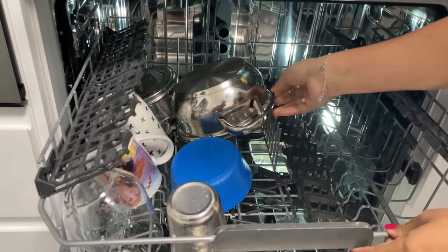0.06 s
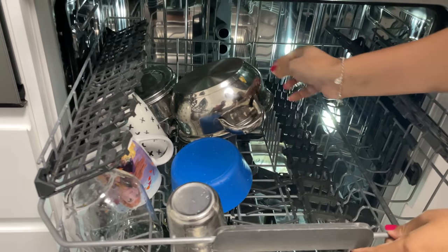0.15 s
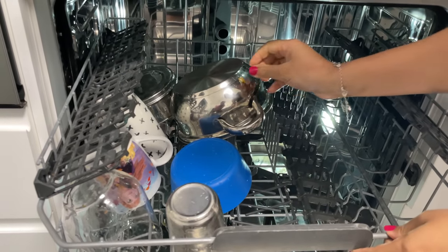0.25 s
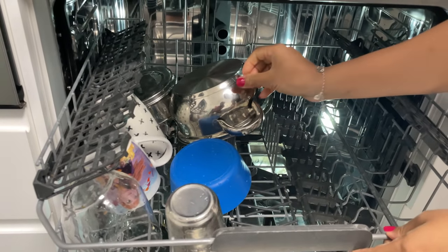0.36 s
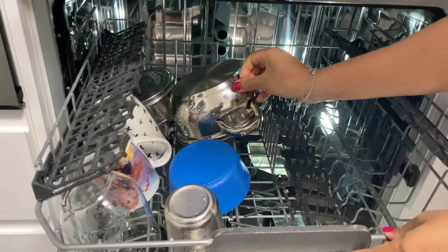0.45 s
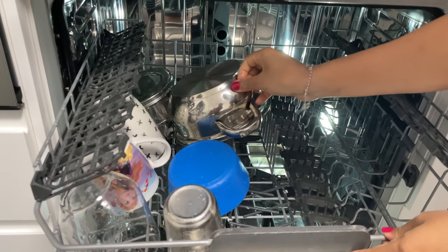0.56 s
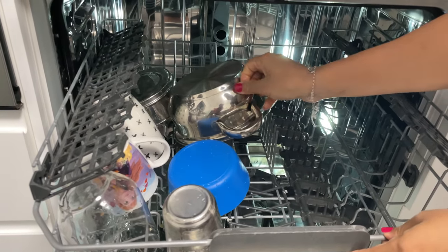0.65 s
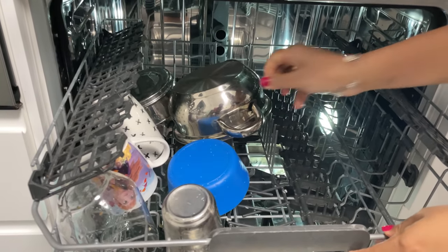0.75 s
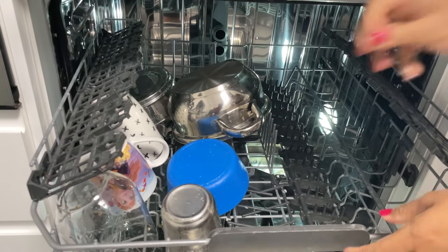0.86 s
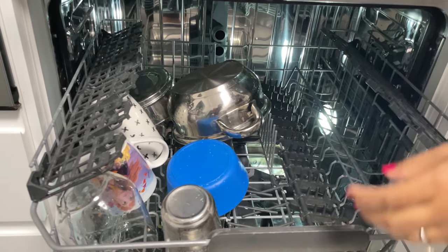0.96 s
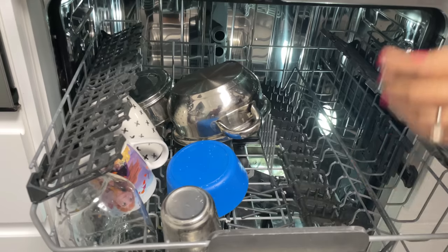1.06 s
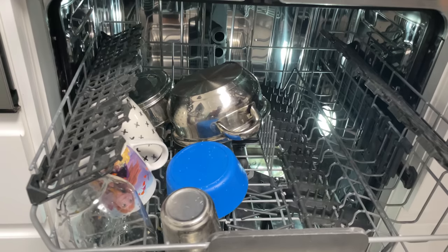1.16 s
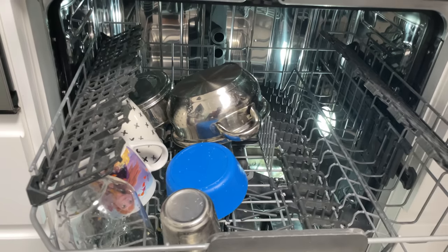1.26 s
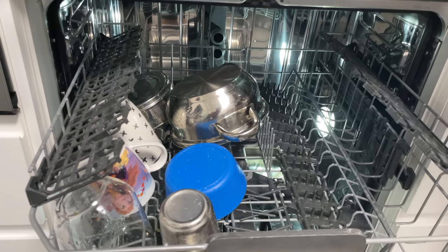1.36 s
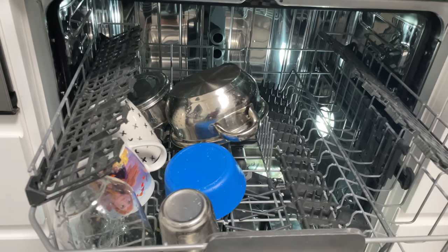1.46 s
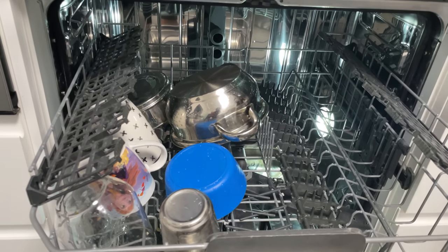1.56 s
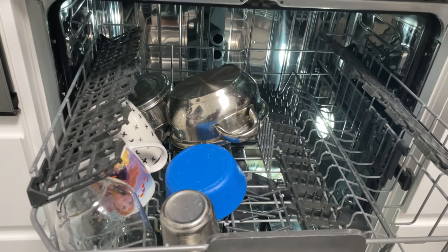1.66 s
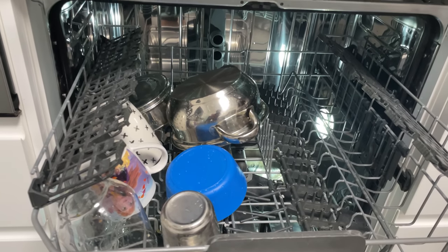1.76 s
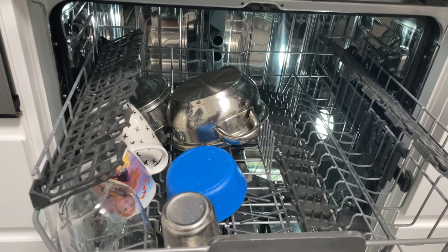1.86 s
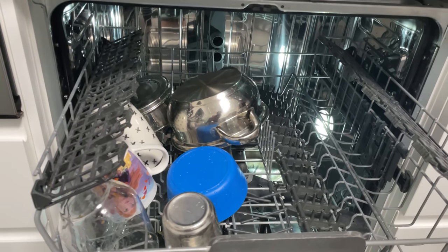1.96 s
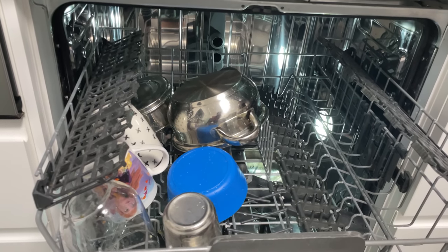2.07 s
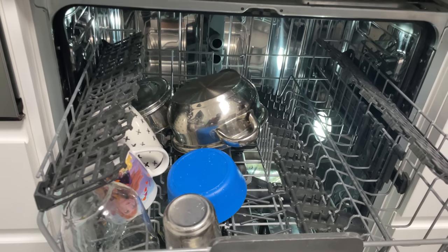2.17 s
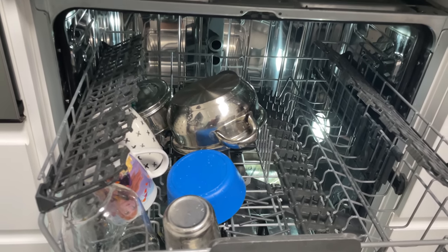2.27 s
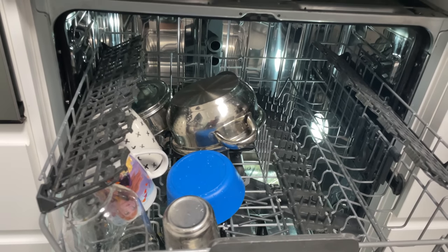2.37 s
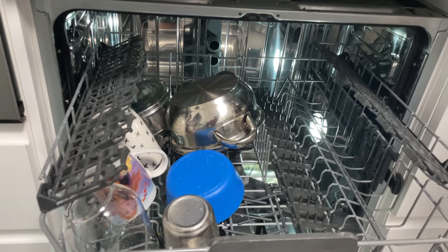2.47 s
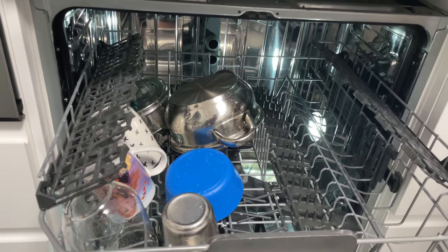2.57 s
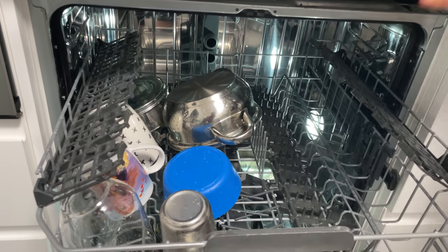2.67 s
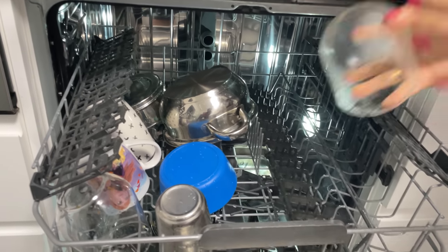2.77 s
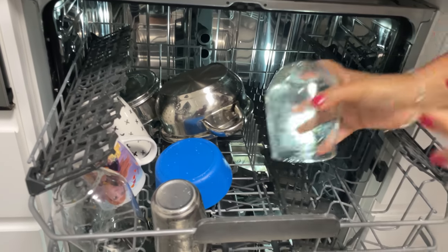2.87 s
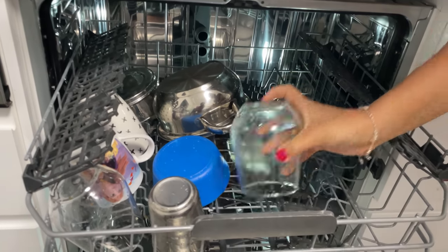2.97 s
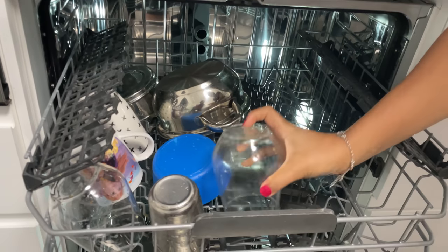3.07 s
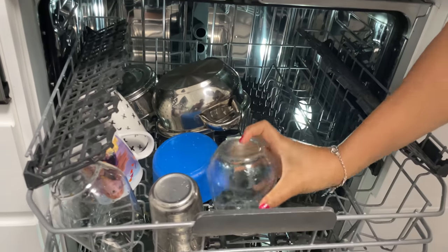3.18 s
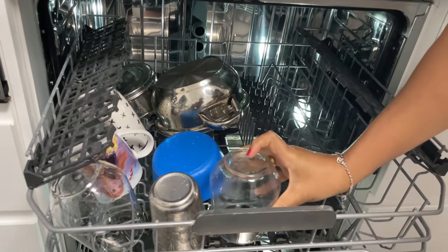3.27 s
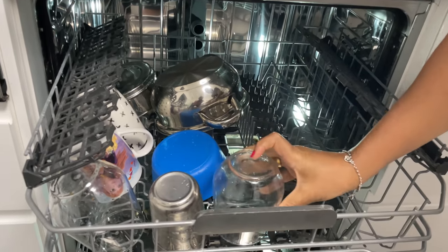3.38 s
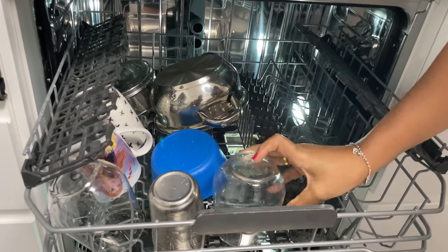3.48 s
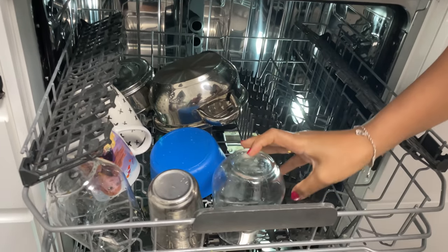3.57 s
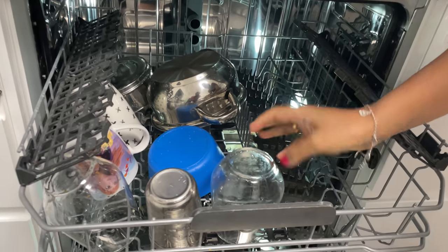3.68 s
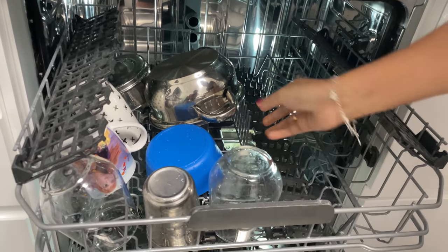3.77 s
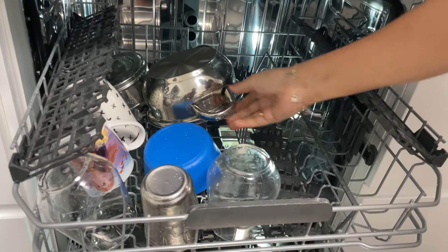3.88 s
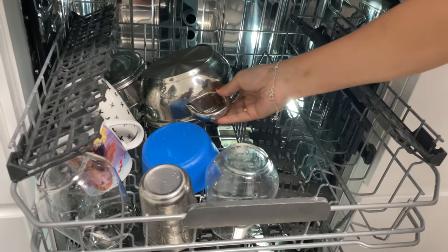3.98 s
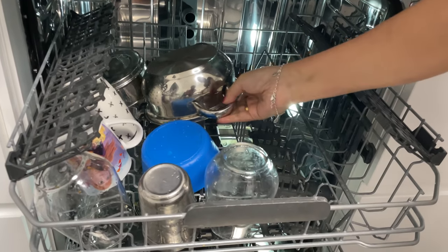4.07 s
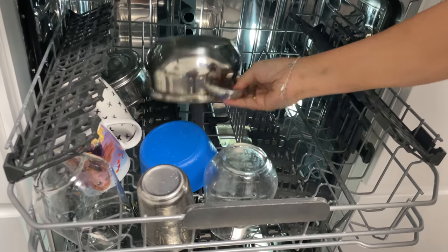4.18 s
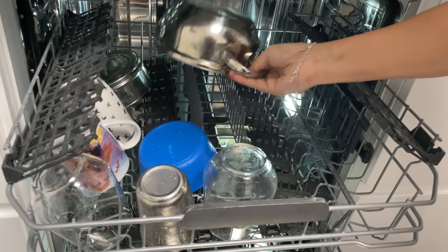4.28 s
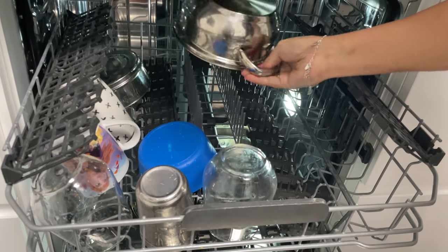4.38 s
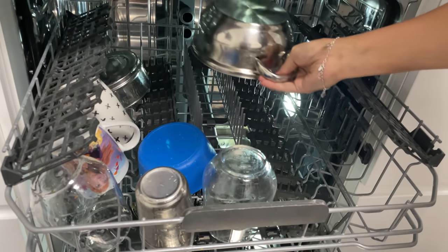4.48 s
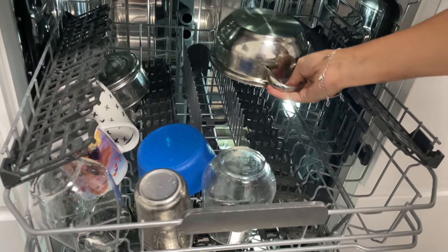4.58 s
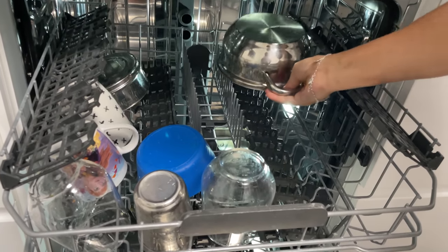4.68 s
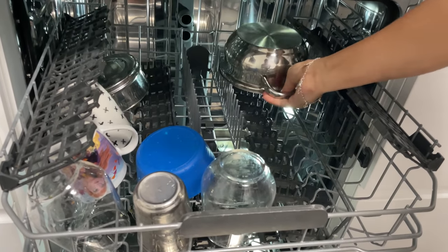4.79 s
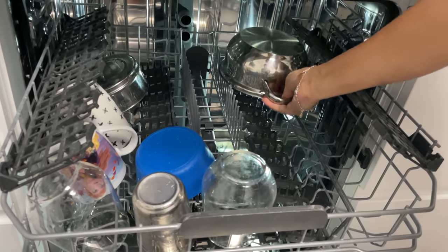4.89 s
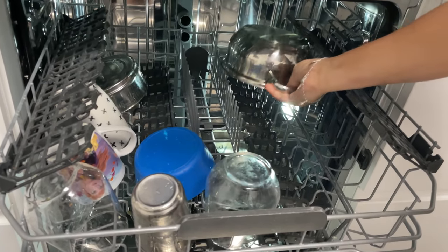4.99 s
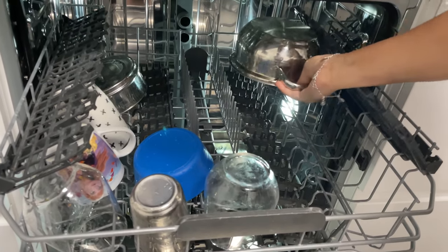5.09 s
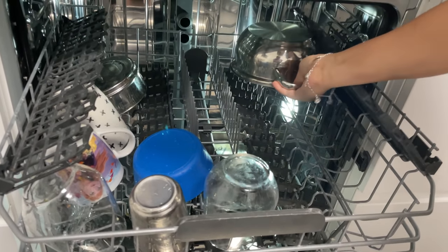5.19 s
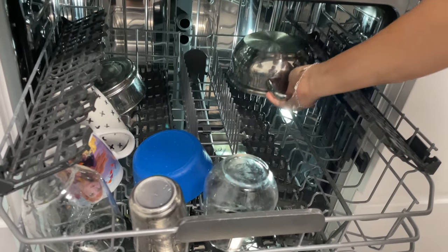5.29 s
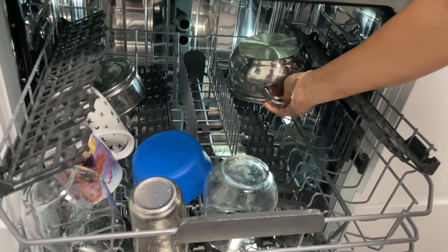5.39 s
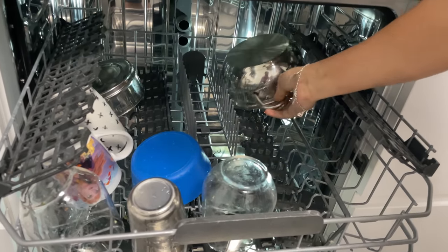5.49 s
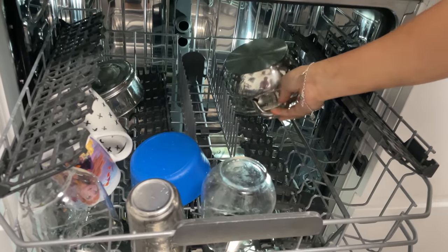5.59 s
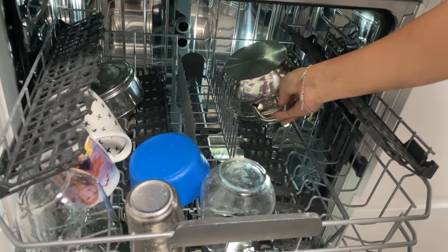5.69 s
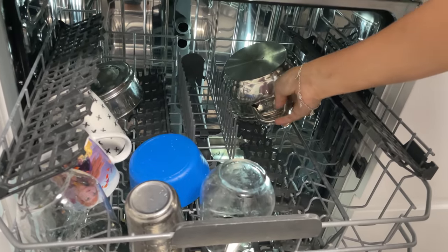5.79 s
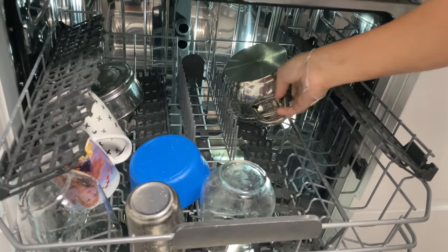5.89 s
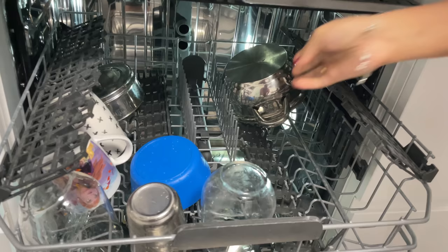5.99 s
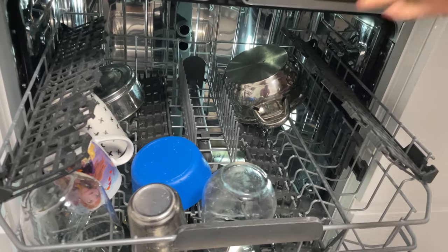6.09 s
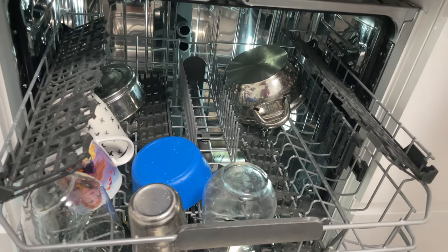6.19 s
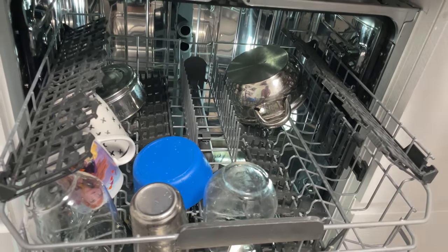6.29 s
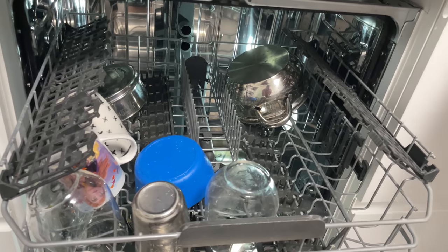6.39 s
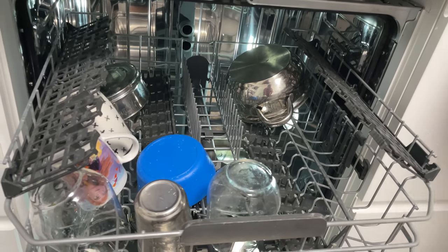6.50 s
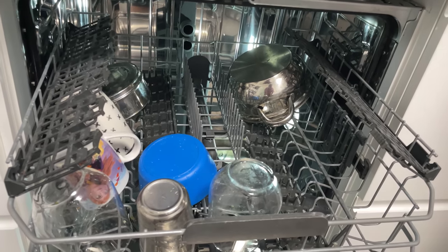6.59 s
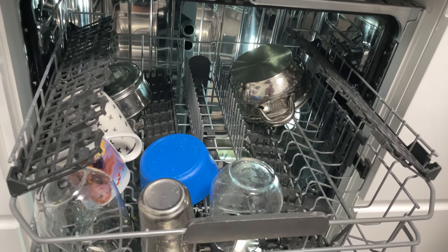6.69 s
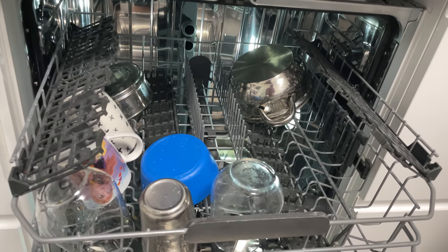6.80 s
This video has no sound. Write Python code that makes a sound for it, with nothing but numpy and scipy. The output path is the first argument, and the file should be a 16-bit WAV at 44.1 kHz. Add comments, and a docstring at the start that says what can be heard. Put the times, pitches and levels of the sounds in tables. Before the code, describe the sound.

Steel pot, glass and glass bowl clink and clang as they are set and shifted in a dishwasher's wire rack in a quiet kitchen.

```python
"""A dishwasher's wire rack is loaded in a small kitchen: a steel pot is nudged, a light jingle sounds, the rack
jolts, a glass clinks, a glass bowl is set between the tines, then the pot is lifted, clangs on a steel bowl and
is knocked into place. Struck things sound by decaying tones, most with a shimmer of overtones and a noisy rattle.
Shaped noise makes the rack's shudder, the sliding and the quiet air; tub and room answer with a noise tail."""
import sys
import numpy as np
from scipy import signal
from scipy.fft import rfft, irfft, next_fast_len
from scipy.io import wavfile
from scipy.ndimage import uniform_filter1d, minimum_filter1d, map_coordinates

SR = 44100
rng = np.random.default_rng(int(sys.argv[2]) if len(sys.argv) > 2 else 0)


def to_wav(s):
    """Save 16-bit WAV."""
    ch = np.atleast_2d(s).T  # columns
    pcm = np.round(np.clip(ch, -1, 1) * 32767)  # PCM
    wavfile.write(sys.argv[1], SR, pcm.astype(np.int16))


N = 302085  # length in samples

# Stereo width, narrow in the bass: pitch_hz, side_over_mid_db
WIDTH = [(100, -14.5), (170, -17), (280, -7.5), (600, -2), (1200, -3), (2200, 1.5), (12000, -1.5)]


def amp(db):
    """Turn decibels into a gain."""
    return 10 ** (np.asarray(db) / 20)


def unit(x):
    """Scale a sound to an average (rms) level of 1."""
    return x / np.sqrt(np.mean(x ** 2) + 1e-20)


def along(points, hz):
    """Read a curve of (Hz, value) points at any pitch, on a log pitch axis."""
    point_hz, value = np.transpose(points)
    return np.interp(np.log(hz + 1), np.log(point_hz), value)


def add(track, start_s, sound):
    """Mix a sound into the track from a start time."""
    start = max(0, round(start_s * SR))
    track[:, start:start + sound.shape[1]] += sound[:, :N - start]


def noise(colour_db, size):
    """Stereo noise with a given level at each pitch, near mono in the bass and wide above."""
    padded = next_fast_len(size)
    hz = np.fft.rfftfreq(padded, 1 / SR)
    mid, side = rfft(rng.standard_normal((2, padded)))
    width = amp(along(WIDTH, hz))
    pair = np.array([mid + width * side, mid - width * side]) / np.hypot(1, width)
    return irfft(pair * amp(colour_db(hz)), padded)[:, :size]


def steady(spectrum):
    """Lasting stereo noise with a given spectrum and an rms level of 1."""
    return unit(noise(lambda hz: along(spectrum, hz), N))


def swell(start_s, length_s, rise_s, t60_s):
    """A gain that rises from its start, holds for a length and dies away, by 60 dB in t60_s."""
    t = np.maximum(np.arange(N) / SR - start_s, 0)
    rise = 1 - np.exp(-t / rise_s)
    return rise * amp(-60 * np.maximum(t - length_s, 0) / t60_s)


def ring(modes, t, scatter_db=0.32, split_hz=7, twin=0.35):
    """Decaying tones; a not quite round vessel splits each into two close pitches that beat."""
    hz, db, t60_s = np.transpose(modes)
    scatter, detune, side = rng.standard_normal((3, len(modes)))
    phase = np.exp(2j * np.pi * rng.random((2, len(modes))))
    pair_hz = np.array([hz, hz + split_hz * detune])
    # one complex factor per sample both turns a tone and shrinks it
    step = np.exp((2j * np.pi * pair_hz - np.log(1000) / t60_s) / SR).ravel()
    waves = np.cumprod(np.broadcast_to(step[:, None], (len(step), len(t))), axis=1)
    sizes = amp(db + scatter_db * scatter) * phase * [[1], [twin]]
    # each tone reaches the two microphones at its own phase
    turn = np.exp(1j * np.arctan(amp(along(WIDTH, hz))) * np.sign(side))
    left_right = np.array([(sizes * turn).ravel(), (sizes / turn).ravel()])
    return (left_right @ waves).imag


def room(x, build_s=0.0009):
    """The blurred answer of tub and kitchen: a noise tail whose treble dies first."""
    # How long the room answers: pitch_hz, t60_s
    kitchen = [(100, 0.97), (400, 0.84), (1200, 0.63), (3500, 0.66), (8000, 0.55), (13000, 0.28)]
    size = x.shape[1]
    hz, t, grid = signal.stft(noise(np.zeros_like, size), SR, nperseg=256)
    decay = amp(-60 * t / along(kitchen, hz)[:, None])
    tail = signal.istft(grid * decay * (1 - np.exp(-t / build_s)), SR, nperseg=256)[1]
    tail = tail / np.sqrt(np.sum(tail ** 2) / 2)
    return signal.fftconvolve(x, tail, axes=1)[:, :size]


def contact(hz, tilt_db, contact_ms):
    """Force of a blow in dB: a slope per octave about 2500 Hz; a longer contact loses more treble."""
    slope = tilt_db * np.log2(hz / 2500)
    return slope - 10 * np.log10(1 + (hz * contact_ms / 1000) ** 4)


def overtones(depth_db=6):
    """Countless weak higher tones, as an uneven comb of (Hz, dB) with its average power evened out."""
    hz = np.geomspace(1000, 16000, 260)
    power = amp(depth_db * np.clip(rng.standard_normal(len(hz)), -2, 2)) ** 2
    comb_db = 10 * np.log10(power / uniform_filter1d(power, size=11))
    return np.c_[hz, comb_db * (hz > hz[0])]  # 0 dB at the bottom and below


def body(modes, width=0.0082, focus=8):
    """The colour (Hz, dB) a thing gives to what rattles against it, strong near its own tones."""
    hz = np.geomspace(100, 16000, 900)
    centre, db, _ = np.transpose(modes)[:, :, None]
    peaks = (amp(db) / (1 + ((hz / centre - 1) / width) ** 2)).sum(0)
    power = (1 + focus * peaks) ** 2
    return np.c_[hz, 10 * np.log10(power / uniform_filter1d(power, size=141))]


def blows(rows, modes, attack_s, room_db):
    """Plain blows that only ring a few tones, with the room's answer."""
    out, t = np.zeros((2, N)), np.arange(SR) / SR
    for start_s, level_db in rows:
        tone = amp(level_db) * ring(modes, t) * (1 - np.exp(-t / attack_s)) ** 2
        add(out, start_s, tone + amp(room_db) * room(tone))
    return out


def strikes(hits, modes, colour, rattle_db, shimmer_db, shimmer_t60, room_db, crack, attack_s):
    """The force of each contact drives main tones, a shimmer of overtones and a noisy rattle."""
    # Colour of the rattle and shimmer in the steel tub: pitch_hz, level_db
    tub = [(30, -26.5), (100, -12.5), (200, -11), (440, -6.5), (650, -0.5), (1050, -4.5), (1800, 2),
           (2800, 5), (4200, 5.5), (6000, -1.5), (8000, -3.5), (10000, 1.5), (13600, -6.5), (14300, -30.5),
           (16000, -39)]
    out, t = np.zeros((2, N)), np.arange(SR * 4 // 5) / SR
    centres, answer_db = np.transpose(colour)
    # spread each band's level over its width in Hz
    shares_db = 10 * np.log10(np.gradient(centres) / (SR / 2))
    shell = body(modes)
    for start_s, level_db, tilt_db, contact_ms, pan_db, ring_db, rattle_t60 in hits:
        comb = overtones()  # every point of contact wakes other overtones
        force_db = level_db + answer_db + contact(centres, tilt_db, contact_ms)
        force = np.c_[centres, force_db]
        density = np.c_[centres, force_db - shares_db]
        colour_db = lambda hz: sum(along(part, hz) for part in (density, tub, shell, comb))

        # the crack is a very short burst at the front of the rattle
        rattle_shape = amp(-60 * t / rattle_t60) + crack * amp(-60 * t / 0.0049)
        rattle = amp(rattle_db) * noise(colour_db, len(t)) * rattle_shape
        shimmer = amp(shimmer_db - 60 * t / shimmer_t60) * noise(colour_db, len(t))
        driven = [(hz, db + along(force, hz), t60_s) for hz, db, t60_s in modes]
        tones = amp(ring_db) * ring(driven, t)
        blow = (rattle + shimmer + tones) * (1 - np.exp(-t / attack_s))

        # the tub returns mostly the first burst of the blow
        answer = amp(room_db) * room(blow * amp(-60 * t / 0.18))
        add(out, start_s, (blow + answer) * amp([[pan_db / 2], [-pan_db / 2]]))
    return out


def kitchen_air():
    """The kitchen's quiet air: steady noise, strongest in the bass."""
    # Spectrum of the air: pitch_hz, relative level_db per Hz
    air = [(15, -31.5), (25, -21.5), (53, 7), (108, -13.5), (145, -7), (195, -18), (309, -13), (463, -15),
           (695, -15.5), (988, -17.5), (1130, -21), (3000, -26), (11900, -38.5), (14000, -46.5),
           (16000, -68.5)]
    return amp(-58.5) * steady(air)


def wobble(rate):
    """A random curve with a new value `rate` times a second, joined by straight lines."""
    values = rng.standard_normal(int(N * rate / SR) + 4)
    return map_coordinates(values, [np.arange(N) * rate / SR], order=1)


def sliding(grain_rate=300, grain_db=1.5, catch_rate=28, catch_db=-0.5):
    """Dishes and runners catch and slip over the wires: uneven bouts of small grains."""
    # Bouts of sliding: start_s, length_s, level_db
    slides = [(0, 0.09, -47), (1.598, .08, -54), (1.725, 0.28, -47.5), (1.853, 0.085, -28.5),
              (2.063, .18, -46), (2.58, 0.076, -62), (2.88, 0.059, -59), (4.28, 0.11, -45),
              (4.553, 0.2, -38), (4.9, 0.38, -44), (5.185, 0.2, -50.5), (5.473, 0.12, -50.5),
              (6.608, 0.23, -53), (6.767, 0.086, -43)]
    # Spectrum of the scrape: pitch_hz, relative level_db per Hz
    scrape = [(120, -47.5), (200, -8.5), (467, -8.5), (503, -8.5), (1170, -2), (1290, -5), (1850, -4.5),
              (5450, -12.5), (11600, -20.5), (13700, -29.5), (15000, -59)]
    rise_s, t60_s = 0.02, 0.36  # a slide gets going, holds and dies away
    bouts = [amp(db) * swell(start_s, length_s, rise_s, t60_s) for start_s, length_s, db in slides]
    effort = np.sqrt(sum(bout ** 2 for bout in bouts))
    grains_db = grain_db * wobble(grain_rate) + catch_db * wobble(catch_rate)
    return effort * unit(steady(scrape) * amp(grains_db))


def rack():
    """Weight shifts and jolts boom in the loaded frame and set it shuddering on its runners."""
    # Weight shifts and jolts: start_s, level_db before the boom and shudder gains
    jolts = [(0, -42.5), (.13, -35), (0.713, -42.5), (1.751, -43), (1.843, -28.5), (1.925, -34),
             (2.086, -41.5), (2.243, -38), (3.346, -28), (3.56, -37), (3.634, -43), (3.781, -46),
             (4.087, -40), (4.168, -34.5), (4.31, -29.5), (4.423, -13), (4.57, -37), (4.726, -33.5),
             (4.838, -27.5), (5.05, -30.5), (5.16, -34), (5.325, -33.5), (5.409, -34), (5.618, -31.5),
             (5.722, -31), (5.831, -42), (6.635, -46), (6.771, -45)]
    # Low tones of the loaded frame: pitch_hz, relative level_db, t60_s
    frame = [(77, 3.5, 0.16), (87, 0, 0.59), (106, -4.5, 0.26), (123, 6.5, 0.13), (138, -5.5, 0.13),
             (173, -4, .3), (223, -7, 0.11), (309, -10, .2)]
    # Spectrum of the shudder: pitch_hz, relative level_db per Hz
    shudder = [(18, -61), (30, -33.5), (68, 1), (86, 8), (124, 0.5), (150, -5), (175, -3), (220, -8.5),
               (283, -5.5), (326, -5), (400, -9.5), (520, -25.5), (880, -120)]
    frame_db, shudder_db = -3, 1  # boom and shudder relative to the jolt
    rise_s, t60_s = 0.018, 0.49  # the shudder's swell and decay
    boom = amp(frame_db) * blows(jolts, frame, attack_s=0.0089, room_db=-14.0)
    sways = [amp(db) * swell(start_s, 0, rise_s, t60_s) for start_s, db in jolts]
    sway = np.sqrt(sum(one ** 2 for one in sways))
    return boom + amp(shudder_db) * sway * steady(shudder)


def metal_ping():
    """A faint metal ping: one decaying tone."""
    # When it sounds: start_s, level_db
    pings = [(.626, -52)]
    # Its tone: pitch_hz, level_db, t60_s
    tone = [(4700, -3, 0.19)]
    return blows(pings, tone, attack_s=0.002, room_db=-1)


def jingle_and_rack_wires():
    """A light treble jingle at 0.48 and 0.625 s, then knocks on the rack's wires: rattle over a weak ring."""
    # Jingle and knocks:
    # start_s, level_db, tilt_db per octave, contact_ms, left_minus_right_db, ring_db, rattle_t60_s
    hits = [(0.48, -76.5, 8.5, .04, 1.1, -14, 0.84), (0.625, -75, 7, .04, 2, -16, 1),
            (0.947, -41, 1.5, 0.32, 1.6, -11, 0.1), (1.405, -34, 2, 0.76, 0.9, -19, 0.22),
            (1.697, -35.5, 4.5, 0.39, 1.7, -14, .13), (1.848, -16, 1.26, .11, 1, -9, 0.21),
            (1.869, -27.5, -2.1, .04, 3, -10.5, 0.52), (2.255, -44.5, -1, 0.051, 2.8, -5, 0.054),
            (2.875, -38.5, 4.5, 0.33, 1.1, -21.5, 0.77), (2.995, -34, 4, 0.36, 2.2, -21, .025),
            (3.149, -50, -0.5, 0.27, 1.5, 1, 0.19), (4.018, -42.5, -4.5, .3, 2, -6, 0.15),
            (6.611, -47, -2.5, 0.081, 2, -18, 0.4), (6.764, -29, 7.5, 0.7, 2.4, -18, .25)]
    # Tones that jingle and wires share: pitch_hz, relative level_db, t60_s
    modes = [(1350, -26, .2), (1710, -26, 0.25), (2730, -24.5, .2), (4960, -12.5, 0.44), (6270, -9, 0.17),
             (10100, -24.5, .15)]
    # How strongly each pitch answers: pitch_hz, level_db
    colour = [(260, 2.5), (700, -3), (1660, .5), (3640, -5), (6700, 2.5), (10900, 1)]
    return strikes(hits, modes, colour, rattle_db=-7, shimmer_db=-9.5, shimmer_t60=0.29,
                   room_db=2.5, crack=0.6, attack_s=0.0014)


def tine():
    """One wire tine is struck and rings in short tones."""
    # Contacts: start_s, level_db, tilt_db per octave, contact_ms, left_minus_right_db, ring_db, rattle_t60_s
    hits = [(3.557, -25, 1.5, 0.23, 1.1, 3.4, 0.025)]
    # Tones of the tine: pitch_hz, relative level_db, t60_s
    modes = [(1406, 1, .06), (1430, -18.5, 0.34), (1550, -4.5, 0.048), (2480, -14.5, .07),
             (3050, -9.5, .035), (3830, -12, .05)]
    # How strongly it answers a blow: pitch_hz, level_db
    colour = [(260.0, 5), (700.0, 5), (1660.0, 10), (3640.0, -0.5), (6700.0, 3.5), (10900.0, 0.5)]
    return strikes(hits, modes, colour, rattle_db=2.0, shimmer_db=-14.0, shimmer_t60=0.38,
                   room_db=-9.0, crack=0.58, attack_s=0.00057)


def drinking_glass():
    """A glass clinks: its clear tones start almost at once."""
    # Contacts: start_s, level_db, tilt_db per octave, contact_ms, left_minus_right_db, ring_db, rattle_t60_s
    hits = [(1.908, -31.5, 0.2, 0.12, -9, -3, 0.19), (1.928, -18.5, 1.5, 0.26, -3, -5, 0.3),
            (1.956, -17.5, 5.5, 0.41, 2, 1, 0.035), (2.032, -31, 2, .27, 14, -2.5, 0.072),
            (2.098, -42.5, 5.5, .43, 0.5, 3, 0.081), (2.29, -33.5, -1.7, 0.054, 1.5, 1.5, 0.061)]
    # Tones of the glass: pitch_hz, relative level_db, t60_s
    modes = [(917, -2, 0.15), (2290, -5, 0.41), (4230, 2.5, 0.39), (4360, -15, 0.18), (6530, -2.5, 0.17),
             (7260, -14, .36), (7730, -12, 0.26), (8645, -14.5, 0.15), (9230, -7, 0.22), (11040, -22, 0.47)]
    # How strongly it answers a blow: pitch_hz, level_db
    colour = [(260.0, -1.5), (700.0, -4), (1660.0, -4.5), (3640.0, -2), (6700.0, 7), (10900.0, 5.5)]
    return strikes(hits, modes, colour, rattle_db=-4.5, shimmer_db=-8.5, shimmer_t60=0.19,
                   room_db=-1.0, crack=0.3, attack_s=0.00032)


def glass_bowl():
    """A glass bowl is set between the tines in a quick run of contacts."""
    # Contacts: start_s, level_db, tilt_db per octave, contact_ms, left_minus_right_db, ring_db, rattle_t60_s
    hits = [(3.333, -18.0, -0.61, 0.14, 3.4, -1.5, 0.17), (3.345, -15.5, 2.2, 0.25, 1.8, 0.0, 0.16),
            (3.384, -20.5, -1.3, 0.18, 1.2, -4.4, 0.091)]
    # Tones of the bowl: pitch_hz, relative level_db, t60_s
    modes = [(560, -9, .45), (632, -1, .2), (690, -5, .12), (735, -9, .12), (900, -12, .4), (1295, -15, .3),
             (1840, -9, .2), (2292, -6, .26), (2660, -9, .3), (3420, -8, .22), (3620, -12, .3),
             (4280, -13, .35), (6540, -11.5, .3), (7260, -9, .4), (8100, -13, .3)]
    # How strongly it answers a blow: pitch_hz, level_db
    colour = [(260.0, 0.0), (700.0, 3), (1660.0, -2.5), (3640.0, -6), (6700.0, 0.5), (10900.0, 2.5)]
    return strikes(hits, modes, colour, rattle_db=-2.0, shimmer_db=-18.0, shimmer_t60=0.56,
                   room_db=-5.5, crack=0.36, attack_s=0.0015)


def steel_bowl_rim():
    """The pot clangs on a steel bowl, whose rim rings in many tones."""
    # Contacts: start_s, level_db, tilt_db per octave, contact_ms, left_minus_right_db, ring_db, rattle_t60_s
    hits = [(4.16, -31.5, 1, 0.2, 1, -6, .1), (4.173, -15.5, -0.93, 0.036, 1.2, -5.5, 0.061),
            (4.215, -17.5, 4, 0.27, 3, -8, .11), (4.226, -18, 5, 0.35, 3, -10, 0.07)]
    # Tones of the rim: pitch_hz, relative level_db, t60_s
    modes = [(723, -3.5, 0.15), (1287, 4, 0.22), (1625, 5, .2), (1730, -2.5, .3), (2250, -10.5, .3),
             (2425, -8, 0.34), (2630, -4, .32), (2760, -10, .45), (3190, -12, 0.27), (3440, -9, .28),
             (3650, -11.5, .3), (4005, -3.5, 0.3), (4170, -7, .3), (4440, -4.5, .38), (4900, -13.5, .3),
             (5130, -10.5, .35), (5320, -9, .28), (5700, -9, 0.27), (5960, -8.5, 0.37), (7200, -3.5, 0.22),
             (10380, -6.5, .12)]
    # How strongly it answers a blow: pitch_hz, level_db
    colour = [(260.0, -8), (700.0, -1.5), (1660.0, 1), (3640.0, 2.5), (6700.0, 2.5), (10900.0, 2.5)]
    return strikes(hits, modes, colour, rattle_db=-0.5, shimmer_db=-7.5, shimmer_t60=0.069,
                   room_db=-0.5, crack=0.64, attack_s=0.0028)


def pot_wall():
    """Square blows on the pot's flat wall ring a few short tones."""
    # Blows: start_s, level_db
    knocks = [(4.010, -49.5), (5.319, -18.5), (5.375, -7.5), (5.607, -29.5), (5.655, -32.5), (5.714, -16.5)]
    # Tones of the wall: pitch_hz, relative level_db, t60_s
    wall = [(1461, -15, .043), (1612, -5.5, .036), (1682, 9.5, 0.066), (1810, -5, 0.18), (3380, -10, 0.16)]
    return blows(knocks, wall, attack_s=0.0018, room_db=-13.0)


def steel_pot():
    """The steel pot is nudged and knocked about: strong rattle over many ringing tones."""
    # Contacts: start_s, level_db, tilt_db per octave, contact_ms, left_minus_right_db, ring_db, rattle_t60_s
    hits = [(0.001, -37.5, 3, 0.28, 4.5, -1, 0.051), (0.034, -36.5, -1.5, 0.5, -1, -1, 0.11),
            (0.104, -43, -2.7, 0.12, 2, -10, 0.34), (0.681, -20.5, 2.5, 1, 2, -7, 0.036),
            (0.694, -27.5, 1, 0.73, -3, -19, .08), (4.033, -42.5, 0.5, 0.089, 1.5, -4, 0.094),
            (4.418, -19.5, 10, .16, 1, -9, 0.029), (4.42, -9.5, 2.5, 0.47, 1.5, -3.5, 0.089),
            (4.733, -33, 4, 0.53, -0.5, 3, 0.042), (4.821, -23, -2, 0.13, 0.5, -12.5, 0.26),
            (4.837, -18, 2.5, 0.36, -3.5, -3, 0.11), (4.862, -26, 3, 0.052, 4, -7, 0.14),
            (5.006, -26.5, 1.5, 0.55, -0.5, -7.5, .087), (5.046, -29.5, 1.5, 0.11, 3.5, -6.5, 0.18),
            (5.065, -30.5, -0.5, 0.14, -2, -4, .12), (5.32, -19.5, 2, 0.34, 2.5, -6, 0.086),
            (5.374, -15.5, -2.7, 0.17, 0.5, -12, .07), (5.606, -36, -2, 0.048, -2.5, -6.5, .033),
            (5.622, -29.5, 1, 0.42, 2.5, -3.5, 0.14), (5.714, -14, 0.57, 0.31, 1, 0, 0.16),
            (5.74, -26, 0.5, 0.38, 3, 1.5, 0.051)]
    # Tones of the pot: pitch_hz, relative level_db, t60_s
    modes = [(524.2, -10.5, 0.36), (556, -5, 0.075), (626, -14, .45), (736, -10, 0.16), (834, -11, .4),
             (898.6, -4, 0.57), (1290, -16, 0.14), (1634, -16, 0.22), (1666, -9, .12), (1706, -7, 0.16),
             (1810, -16, .3), (2107, -13.5, 0.35), (2470, -13.5, 0.41), (2740, -17.5, .45), (2840, -13, .6),
             (3026, -16.5, .5), (3424, -2.5, .26), (3630, -13, .6), (3877, -6.5, 0.4), (4230, -9.5, .5),
             (4866, -6, 0.35), (5512, -13, 0.53), (5980, -19, .42), (6560, -13, 0.51), (7220, -13, 0.28),
             (8900, -15.5, .3), (9400, -12.5, .23), (9790, -15, .24), (10400, -15.5, .15), (10960, -12, .2),
             (13000, -21, .2)]
    # How strongly it answers a blow: pitch_hz, level_db
    colour = [(260, -6), (700, 4), (1660, 1), (3640, -3), (6700, 0), (10900, 2.5)]
    return strikes(hits, modes, colour, rattle_db=0.5, shimmer_db=-11.5, shimmer_t60=0.14,
                   room_db=-2.5, crack=0.58, attack_s=0.0014)


def scene():
    """Dishes, rack and small metal sounds over the kitchen's quiet air."""
    background = kitchen_air() + sliding() + rack()
    small_metal = metal_ping() + jingle_and_rack_wires() + tine()
    dishes = drinking_glass() + glass_bowl() + steel_bowl_rim() + pot_wall() + steel_pot()
    return background + small_metal + dishes


def record(dry):
    """The recorder's limiter holds peaks at full scale; then all above its band limit is removed."""
    top_hz = 16400
    needed = 1 / np.maximum(np.abs(dry).max(0), 1)
    # turn down a little ahead of each peak, and smoothly
    gain = uniform_filter1d(minimum_filter1d(needed, size=133), size=67)
    size = next_fast_len(N + SR // 2)
    kept = np.fft.rfftfreq(size, 1 / SR) < top_hz
    return irfft(rfft(dry * gain, size) * kept, size)[:, :N]


dry = scene()
out = record(dry)
to_wav(out)
```